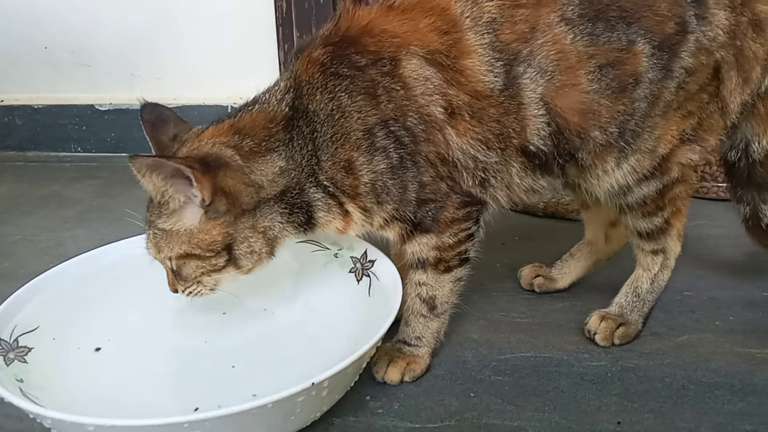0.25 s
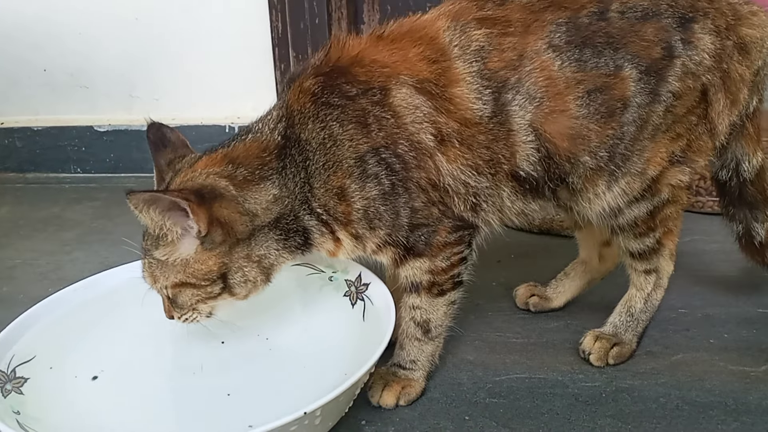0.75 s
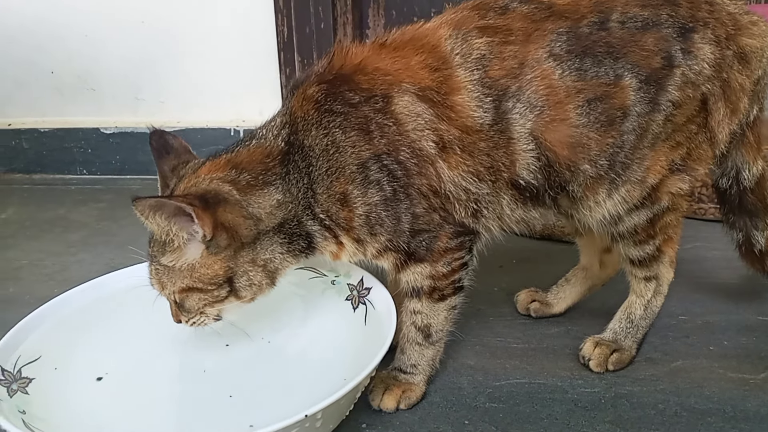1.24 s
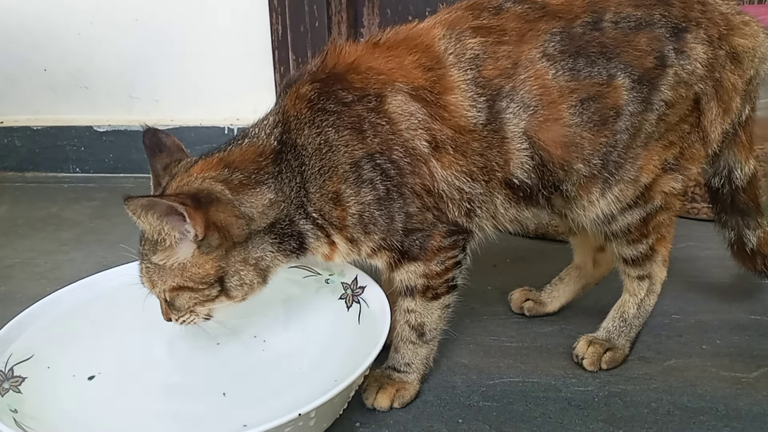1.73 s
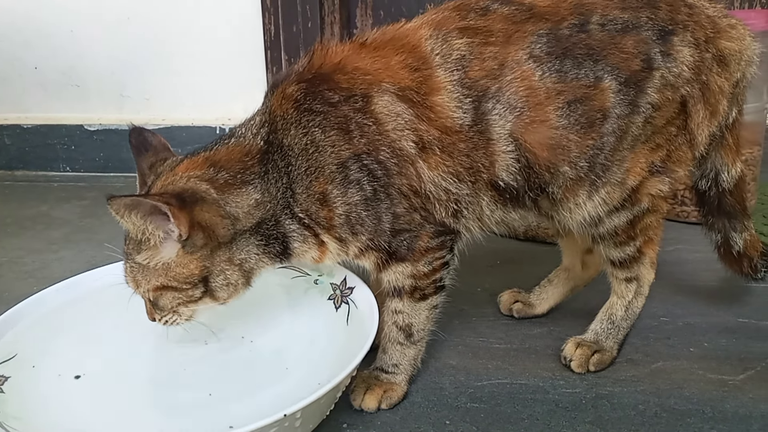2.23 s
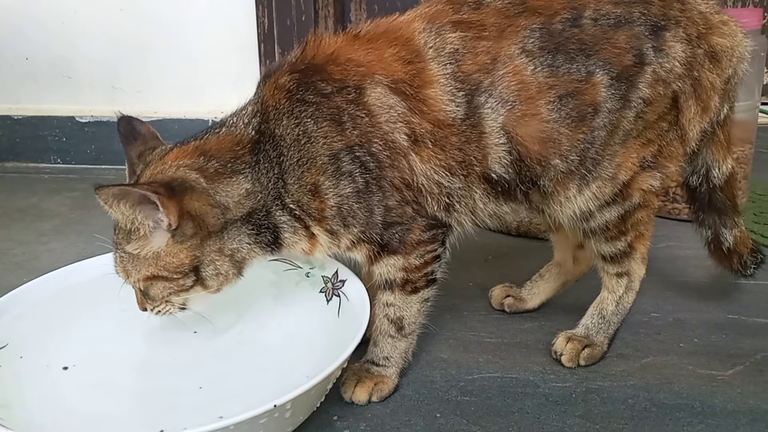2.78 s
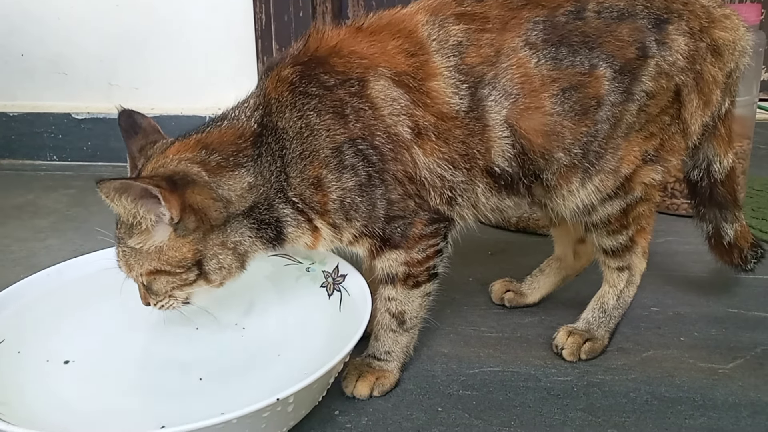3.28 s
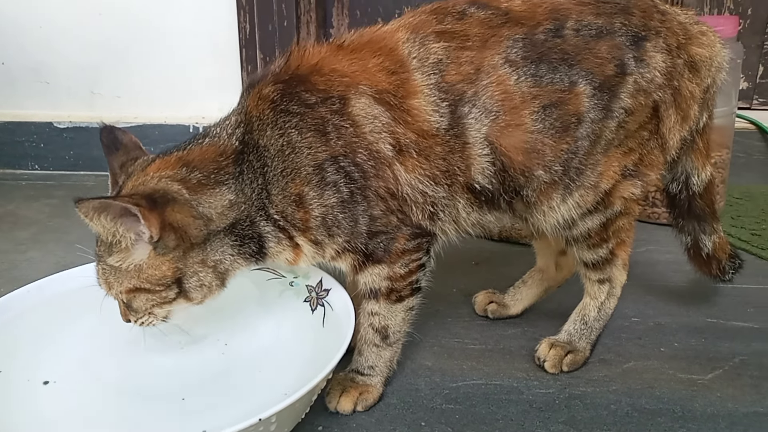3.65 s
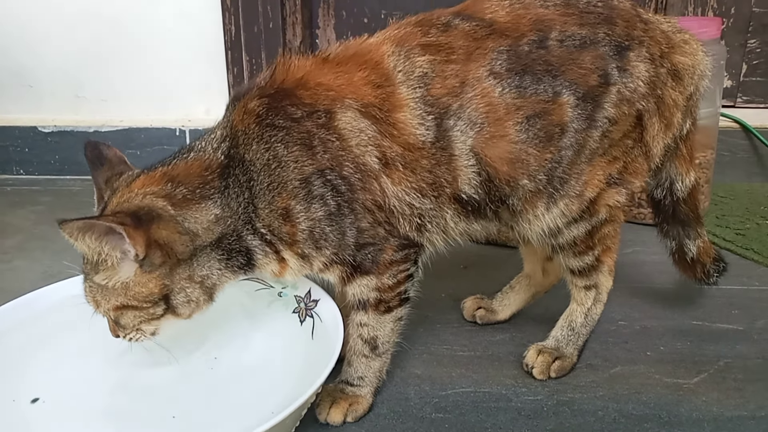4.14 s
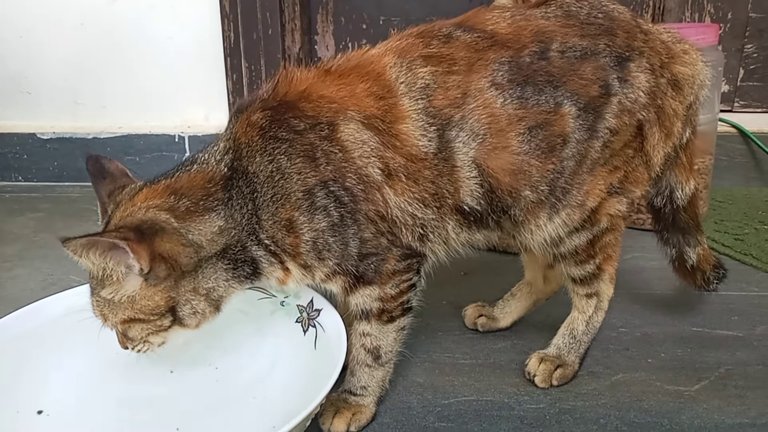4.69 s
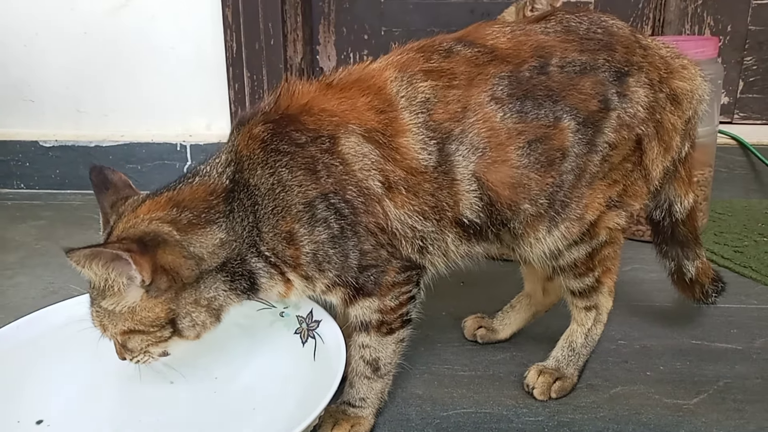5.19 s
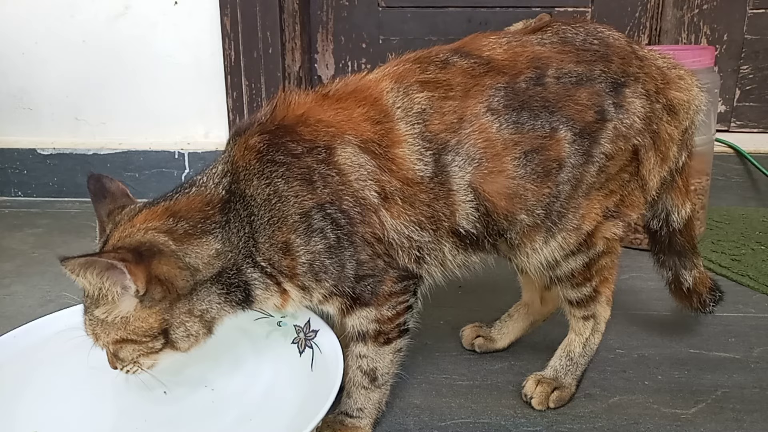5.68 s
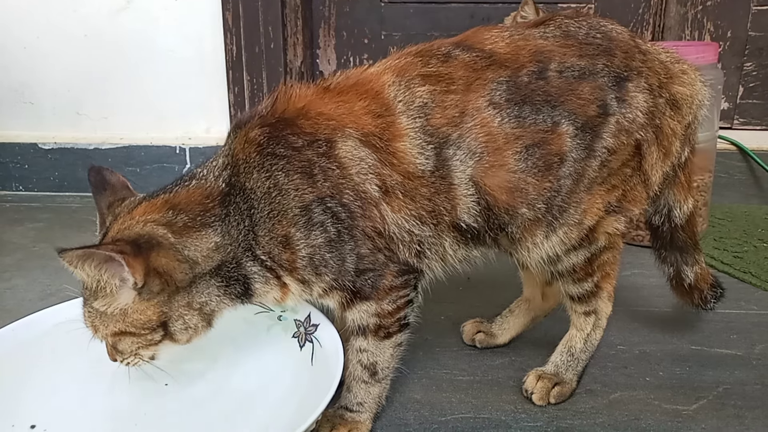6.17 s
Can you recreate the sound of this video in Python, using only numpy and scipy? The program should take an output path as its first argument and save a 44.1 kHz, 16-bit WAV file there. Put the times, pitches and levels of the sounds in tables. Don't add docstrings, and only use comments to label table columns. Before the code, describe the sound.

A cat meows at the start and again midway while water laps softly in a bowl, under a constant high cicada and cricket trill.

```python
import sys
import numpy as np
from scipy import signal
from scipy.fft import rfft, irfft
from scipy.io import wavfile
from scipy.ndimage import uniform_filter1d

SR = 44100
rng = np.random.default_rng(int(sys.argv[2]) if len(sys.argv) > 2 else 0)


def store_wav(level_fs):
    pcm = np.round(np.clip(np.atleast_2d(level_fs), -1, 1) * 32767)
    wavfile.write(sys.argv[1], SR, pcm.T.astype(np.int16))


def how_loud(loudness_db):
    steps = np.asarray(loudness_db, float) / 20
    return 10 ** steps


N = 283122
T = np.arange(N) / SR
F = np.arange(N // 2 + 1) * SR / N + 1e-3
PORT_LAG = 38


def unit(x):
    return x / np.sqrt(np.mean(x ** 2))


def ring(x, hz, width_hz):
    return signal.lfilter(*signal.iirpeak(hz, hz / width_hz, fs=SR), x)


def steep_ring(x, hz, width_hz):
    return ring(ring(x, hz, width_hz), hz, width_hz)


def sos_filter(x, order, edge_hz, kind="low"):
    return signal.sosfilt(signal.butter(order, edge_hz, kind, fs=SR, output="sos"), x)


def on_log(table):
    hz, value = np.transpose(table)
    return np.interp(np.log(F), np.log(hz), value)


def colour(x, spectrum, low_hz, top_hz):
    inside = 1 / (1 + (low_hz / F) ** 40) / (1 + (F / top_hz) ** 40)
    return unit(irfft(rfft(x) * how_loud(on_log(spectrum)) * inside, N))


def walk(rate_hz):
    k = int(SR / rate_hz)
    steps = np.repeat(rng.standard_normal(N // k + 1), k)
    return unit(uniform_filter1d(uniform_filter1d(steps, k), k)[:N])


def phase(hz):
    return 2 * np.pi * np.cumsum(hz) / SR


def streak(hz, width_hz):
    pair = signal.lfilter(*signal.butter(2, width_hz / 2, fs=SR), rng.standard_normal((2, N)))
    turn = phase(hz)
    return unit(pair[0] * np.cos(turn) + pair[1] * np.sin(turn))


def place(x, lean_db):
    g = how_loud(lean_db)
    return x * np.array([2 * g / (1 + g), 2 / (1 + g)]).reshape(2, -1)


def curve(rows):
    s, *cols = np.transpose(rows)
    since_start = T - s[0] + (s[0] == 0)
    gate = np.clip(np.minimum(since_start, s[-1] - T) / 0.0097, 0, 1)
    return gate, [np.interp(T, s, c) for c in cols]


def porch(x, t60_s, damp_hz):
    t = T[:int(t60_s * SR)]
    tail = rng.standard_normal((2, len(t))) * 1000. ** (-t / t60_s) * (t > .004)
    tail = signal.lfilter(*signal.butter(1, damp_hz, fs=SR), tail)
    tail = tail / np.sqrt((tail ** 2).sum(axis=1, keepdims=True))
    return signal.fftconvolve(x, tail, axes=1)[:, :N]


def cicadas():
    # t/s, timbal level/dB, left minus right/dB
    chorus = [
        (0, -32, 22),
        (1.25, -31, 22),
        (2.9, -31, 22),
        (3.6, -32.5, 21),
        (4.5, -33, 19),
        (6.42, -34, 18),
    ]
    # f/Hz, density/dB
    timbal_spectrum = [(3350, -55), (5700, -17.5), (6330, -11), (6790, -6), (6970, -4), (7130, 4.5),
                       (7430, 10.5), (7670, 3.5), (7810, 0), (8080, -14.5), (8310, -14.5), (8900, -25),
                       (11600, -92.5), (19600, -120)]
    # f/Hz, density/dB
    over_spectrum = [(8060, -97), (13700, -50), (13800, -27), (14000, -23.5), (14100, -6.5), (14600, 14),
                     (15100, 15.5), (15600, 21.5), (16000, -17)]
    throb_parts = [(1, 0.11), (3, 0.044), (4, 0.022), (5, 0.033)]
    burst_hz = 23.13
    _, (db, lean_db) = curve(chorus)
    over_db = -8.5 + 0.66 * (db - db.max())
    turn = phase(burst_hz * (1 + 0.004 * walk(3.5)))
    throb = sum(depth * np.cos(k * turn + k * k) for k, depth in throb_parts)
    clicks = rng.standard_normal((2, N)) * (rng.random((2, N)) < .3)
    bursts = clicks * np.clip(1 + throb, 0, None) * how_loud(.5 * walk(14))
    timbal = colour(bursts, timbal_spectrum, 6090, 8460)
    timbal[1] = unit(ring(timbal[1], 6400, 1400))
    over = colour(clicks * np.clip(1 + 1.7 * throb, 0, None), over_spectrum, 12300, 15320)
    song = place(timbal, lean_db - .3) + how_loud(over_db + 1.5) * place(over, lean_db - 10.5)
    return how_loud(db + 0.48) * song


def air():
    # f/Hz, density/dB
    spectrum = [(15, -50), (25, -2.5), (101, 2.5), (202, -2.5), (291, -20), (544, -23), (952, -21),
                (1210, -23.5), (1530, -18), (1700, -18.5), (1900, -19), (2400, -23.5), (3390, -23),
                (4030, -35), (4300, -52), (5590, -36), (9460, -120)]
    # f/Hz, left minus right/dB
    lean = [(60, 3.5), (200, 7), (600, 1.5), (1400, 9), (4400, 17.5)]
    # f/Hz, left-right likeness/0-1
    likeness = [(60, .92), (150, 0.63), (300, 1), (640, 0.34), (1400, 0.028)]
    # t/s, peak level/dB, length/s
    rumble = [(0.155, -55.5, 0.55), (0.905, -58, 0.042), (1.11, -56, 0.044), (1.28, -59, 0.063),
              (1.45, -54.5, 0.062), (1.97, -50, 0.045), (2.32, -60, 0.46), (3.013, -61, 0.045),
              (3.144, -45.5, 0.056), (3.447, -57.5, .2), (4.697, -53.5, 0.39), (4.913, -47, 0.052),
              (5.55, -57, 0.22), (6.313, -54, 0.16)]
    # f/Hz, width/Hz, level/dB, left minus right/dB
    whines = [(105, 11.7, -64.5, 0.5), (1549, 54, -68.5, 14), (1904, 51, -64.5, 36.5), (2200, 20, -76, 15),
              (4740, 440, -65, 18)]
    lull_db, hiss_db = -59, -60.5
    a, b = rfft(rng.standard_normal((2, N)))
    alike = np.clip(on_log(likeness), -.99, .99)
    left = a * np.exp(-2j * np.pi * F * PORT_LAG / SR)
    right = alike * a + np.sqrt(1 - alike ** 2) * b
    pair = np.array([left, right]) * how_loud(on_log(spectrum)) / (1 + (F / 4200) ** 12)
    pair = place(pair, on_log(lean))
    bass = 1 / (1 + (F / 280) ** 6)
    low, high = irfft(pair * np.sqrt(bass), N), irfft(pair * np.sqrt(1 - bass), N)
    gusts = how_loud(lull_db) + sum(how_loud(db) * np.exp(-(2 * (T - s) / length) ** 2) for s, db, length in rumble)
    bed = gusts * how_loud(1.54 * walk(9)) * low / np.std(low.mean(axis=0))
    hiss_level = how_loud(hiss_db + 1.9 * walk(2.354) + 0.72 * walk(18.0))
    bed = bed + hiss_level * high / np.std(high.mean(axis=0))
    for hz, width_hz, db, lean_db in whines:
        waver = how_loud(db + 2.5 * walk(5) + 2.5 * walk(16))
        bed = bed + place(waver * unit(steep_ring(rng.standard_normal(N), hz, width_hz)), lean_db)
    return bed


def cat():
    # t/s, effort/dB, mouth opening/0-1, hoarseness/0-1
    meows = [
        [(0, -31.5, 1, 0.41), (.06, -31, 1, 0.17), (.114, -31.5, 0.91, 0.04), (.2, -40, 0.84, 0.14),
         (.26, -40, 0.6, 0.04), (.3, -45.5, 0.64, 0.01), (.36, -46.5, 0.38, 0), (.45, -47.5, 0.41, .1),
         (.5, -57, 0.33, .2)],
        [(2.6, -52, 0, 0.05), (2.68, -37.5, 0, 0), (2.725, -39, 0.75, 0.27), (2.8, -34.5, 1, 0.51),
         (2.84, -37.5, 0.9, 0.12), (2.93, -33.5, 0.96, 0.11), (3.0, -36.5, 0.75, 0.06),
         (3.06, -44.5, 0.47, 0.05), (3.27, -48.5, 0.38, 0.15)],
        [(3.28, -58, 0.26, 0.4), (3.33, -55, 0.31, 0.55), (3.45, -59, 0.1, .3)],
    ]
    # t/s, pitch/Hz
    pitches = [
        [(0, 552), (.04, 572), (.075, 593), (.114, 603), (.25, 607), (.275, 638), (.43, 652), (.49, 680),
         (.56, 700)],
        [(2.6, 707), (2.625, 640), (2.668, 549), (2.71, 507), (2.76, 523), (2.86, 538), (2.92, 562), (3.0, 577),
         (3.27, 603)],
        [(3.28, 640), (3.33, 657), (3.45, 672)],
    ]
    vowels = [(1, -8, -27, -6, -24), (2, -16, -13, -15, -12), (3, -9, -4, 0, -9), (4, -9, -6, 0, 0),
              (5, 0, 1, 0, 0), (6, -24, -14, -12, -5), (7, -26, -42, -32, -36), (8, -22, -34, -26, -31),
              (9, -18, -29, -26, -31), (10, -1, -28, -12, -26), (11, -6, -14, -12, -29)]
    # f/Hz, width/Hz, depth/dB
    dips = [(1668, 42, -5), (2533, 110, -12.5)]
    lips_db = 42
    half_beat = .6
    out = np.zeros((2, N))
    flutter, rattle = [walk(27.79) for _ in range(6)], [walk(420) for _ in range(4)]
    for n, (pitch, rows) in enumerate(zip(pitches, meows)):
        gate, (effort_db, gape, hoarse) = curve(rows)
        hz = np.interp(T, *np.transpose(pitch))
        turn = phase(hz * (1 + .0015 * walk(60) + .012 * hoarse * walk(45)))
        for k, *vowel in vowels:
            narrow_db, wide_db = vowel[2:] if n else vowel[:2]
            closed_db = narrow_db - lips_db if k > 1 else 0
            db = effort_db + np.interp(gape, (0, .5, 1), (closed_db, narrow_db, wide_db))
            db = db + sum(dip_db * np.exp(-((k * hz - dip_hz) / w) ** 2) for dip_hz, w, dip_db in dips)
            rough = 1 + hoarse * 0.079 * min(k, 8) ** 2 * rattle[k % 4]
            rough = rough + half_beat * hoarse * (k > 3) * np.cos(turn / 2)
            flutter_db = (1.8 * (k > 1) + 1 * (k > 6) + .3) * flutter[k % 6]
            tone = gate * how_loud(db + 3 + flutter_db) * rough * np.sin(k * turn + k * k)
            out += place(tone, 17 - 12 / k ** .9)
    out[1] = np.roll(out[1], -PORT_LAG)
    return out + how_loud(-14) * porch(sos_filter(out, 2, 900, "high"), .45, 4000)


def taps(events, t60_s, width, rise_s=0.00078, crack_hz=0):
    out = np.zeros((2, N))
    t = T[:int(t60_s * SR)]
    fade = np.clip(t / rise_s, 0, 1) * 1000. ** (-t / t60_s)
    chance = rng.standard_normal((len(events), 2, len(t)))
    for (s, db, hz, lean_db, *crack_db), grit in zip(events, chance):
        tap = steep_ring(grit[0] * fade, hz, width * hz)
        tap = tap / np.abs(tap).max()
        if crack_db:
            crack = ring(ring(grit[1] * fade, crack_hz, 0.24 * crack_hz), crack_hz, 0.3 * crack_hz)
            tap = tap + how_loud(min(crack_db[0] + 2.5, 3)) * crack / np.abs(crack).max()
        i = int(s * SR)
        out[:, i:i + len(t)] += place(how_loud(db) * tap, lean_db)[:, :N - i]
    return out


def smacks():
    # t/s, peak level/dB, f/Hz, left minus right/dB
    events = [(0.1125, -41.5, 9900, 24), (0.9471, -32, 11600, -7), (1.0993, -37, 10700, -18),
              (1.1961, -36, 10500, -34), (1.4899, -42, 9400, 12), (1.7723, -36, 11200, -15),
              (2.209, -34, 11400, -32), (2.6598, -43, 11000, -22), (3.2265, -34, 11500, -22),
              (3.3602, -39, 9650, 12), (3.6216, -39, 11000, -29), (3.677, -37, 11200, -25),
              (4.364, -44, 10900, -18), (4.6856, -54, 10900, -14), (5.5023, -42, 10500, -22)]
    return sos_filter(taps(events, 0.0085, 0.22), 4, (8800, 13800), "band")


def laps():
    # t/s, peak level/dB, ring f/Hz, upper crack/dB
    drops = [(0.4415, -37.5, 2960, -32), (0.81, -48, 3000, 2), (0.992, -47, 2800, 2),
             (1.098, -35, 3320, -10), (1.2686, -48, 3260, 7), (1.3243, -40.5, 3500, -20),
             (1.4875, -38.5, 3140, -0.5), (1.593, -51, 3020, -11), (1.7118, -27, 3220, -4.5),
             (1.8547, -45.5, 3060, -3), (1.9292, -40, 3140, -12), (1.9971, -46.5, 3400, -15),
             (2.0677, -30.5, 3510, -15), (2.597, -44, 3100, -17), (3.231, -43, 2870, -20),
             (3.245, -49, 3300, -20), (3.58, -61, 3500, -13), (3.69, -53, 3120, -15), (3.8, -65, 2970, -15),
             (3.36, -44.5, 2730, 9), (3.8706, -67, 2940, 9.5), (3.9302, -49, 3340, -20),
             (4.015, -47.5, 3380, -9), (4.1432, -49.5, 3360, -9), (4.243, -53, 2930, -17),
             (4.3637, -45.5, 3000, -8), (4.448, -50, 3470, -18), (4.5757, -49.5, 3530, -14),
             (4.9453, -36.5, 3420, 6), (5.0676, -49.5, 3450, -10), (5.291, -38.5, 3140, -29),
             (5.3849, -47, 3530, -5), (6.0528, -48.5, 3600, -13), (6.107, -52, 3100, -15),
             (6.185, -53, 3100, -17), (5.12, -46, 4800, 9), (.113, -51, 3300, 9), (.55, -48, 3130, -17),
             (6.387, -51, 3600, -6)]
    lean_db, turn_db_s = 18.5, -1.5
    events = [(s, db, hz, lean_db + turn_db_s * s, crack_db) for s, db, hz, crack_db in drops]
    return taps(events, .028, .16, rise_s=.003, crack_hz=5500)


def knocks():
    # t/s, peak level/dB, ring f/Hz, left minus right/dB
    events = [
        (0.118, -45, 310, 21),
        (1.281, -46, 520, 20),
        (2.53, -53.5, 345, 19),
        (3.359, -47.5, 620, 22),
        (3.449, -45.5, 495, 21),
        (3.667, -50, 537, 14.5),
        (3.87, -48.5, 590, 20),
    ]
    return taps(events, 0.046, 0.67)


def coos():
    # t/s, peak level/dB, f/Hz, left minus right/dB
    events = [(.5, -50.5, 786, 6), (.98, -52, 753, 16), (1.43, -54, 770, 13), (1.5, -45, 3020, 22),
              (1.74, -55, 3040, 16), (1.84, -51, 760, 6), (2.2, -55, 697, 9), (3.24, -50.5, 1050, 9),
              (3.25, -50, 1350, 8), (3.39, -47.5, 1390, 10), (5.27, -63, 720, 18), (5.87, -58.5, 950, 2),
              (5.95, -52, 2200, 12), (6.15, -52, 2200, 20), (6.0, -59, 1300, 15)]
    return taps(events, 0.28, 0.14, rise_s=0.011)


def katydid():
    # start/s, end/s, final level/dB
    phrases = [
        (.18, .78, -69),
        (.93, 1.44, -68),
        (1.52, 2.15, -68),
        (2.25, 2.81, -66.5),
        (2.95, 3.55, -68),
        (3.72, 4.21, -67),
        (4.3, 4.82, -67),
        (4.92, 5.47, -68),
        (5.6, 6.2, -67),
        (6.3, 6.6, -68),
    ]
    swell = 0
    for s, end, db in phrases:
        rise_db = -7 * (end - T) / (end - s)
        ramp = np.clip(np.minimum((T - s) / 0.11, (end - T) / 0.034) + .5, .06, 1)
        swell = swell + how_loud(db + rise_db) * ramp * (T > s - .2) * (T < end + .2)
    strokes = (.5 + .5 * np.cos(phase(142 * (1 + 0.011 * walk(0.77))))) ** 1.5
    buzz = unit(steep_ring(rng.standard_normal((2, N)) * (strokes + 1.0), 10750, 400))
    buzz = buzz * how_loud(2.5 * walk(14))
    return place(swell * colour(buzz, [(10000, 0), (12000, 0)], 10350, 11350), -45)


def cricket():
    # first chirp/s, chirps, period/s
    runs = [
        (.181, 9, .2065),
        (2.066, 3, .198),
        (2.683, 6, .2005),
        (3.898, 7, .2045),
        (5.357, 6, .1983),
    ]
    out = np.zeros((2, N))
    t = T[:int(.13 * SR)]
    hold = np.exp(-(t / .052) ** 1.6)
    accent = .45 * np.exp(-((t - .016) / .005) ** 2)
    shape = np.clip(t / .014, 0, 1) ** 2 * (hold + accent)
    times = np.concatenate([s + period * np.arange(n) for s, n, period in runs])
    chance = rng.standard_normal((len(times), 2, len(t)))
    for s, teeth in zip(times, chance):
        db, lean_db = -41 + 0.7 * teeth[0, 0], 12.5 + 2.5 * teeth[1, 0]
        i = int(s * SR) - 640
        out[:, i:i + len(t)] += place(how_loud(db) * teeth * shape, lean_db)[:, :N - i]
    plate, rim = steep_ring(out, 4700, 330), steep_ring(out, 5250, 650)
    wing = plate + how_loud(-8) * np.roll(rim, 450, axis=1)
    wing = how_loud(12.0) * sos_filter(wing, 4, (4350, 5700), "band")
    return wing + how_loud(-35.0) * porch(wing, 0.54, 11000)


def rasp():
    # t/s, length/s, peak level/dB, starting centre f/Hz
    rasps = [
        (1.959, 0.67, -48, 3654),
        (5.352, 0.6, -49.5, 3900),
    ]
    # share of length, level/dB
    rasp_swell = [(0, -21), (.2, -5), (.6, -0.5), (.86, -12.5), (1, -45)]
    # offset from centre/Hz, width/Hz, level/dB
    ridge_table = [(171.5, 96, -5), (-130, 240, -5), (-650, 130, -11.5)]
    sag_hz = 326
    out = 0
    for s, length, peak_db, start_hz in rasps:
        u = (T - s) / length
        db = peak_db + np.interp(u, *np.transpose(rasp_swell))
        hz = start_hz - sag_hz * np.clip(u, 0, 1)
        spectrum = [(2700, -8), (3300, -3), (3800, 0), (4200, -3)]  # f/Hz, level/dB
        scrape = colour(rng.standard_normal((2, N)), spectrum, 2900, 4170)
        ridges = sum(how_loud(lift_db + 2.5 * walk(12)) * streak(hz + off, w) for off, w, lift_db in ridge_table)
        strokes = (u > 0) * (u < 1) * how_loud(db + 1.1 * walk(110))
        out = out + place(strokes * (how_loud(-3) * scrape + ridges), 14.7)
    return out


def whistles():
    # t/s, length/s, from f/Hz, to f/Hz, level/dB
    slurs = [
        (3.73, .06, 5700, 6150, -63),
        (4.79, .11, 5450, 6250, -64),
        (5.97, .09, 5850, 6300, -62),
    ]
    out = 0
    for s, length, from_hz, to_hz, db in slurs:
        u = np.clip((T - s) / length, 0, 1)
        out = out + how_loud(db) * np.sin(np.pi * u) * streak(from_hz + (to_hz - from_hz) * u, 60)
    return place(out, 14)


def scene():
    near = laps() + knocks() + coos()
    near = near + how_loud(-9.5) * porch(near, 0.082, 6000)
    low = sos_filter(cricket() + whistles() + rasp() + cat() + near + air(), 8, 7500)
    return cicadas() + katydid() + smacks() + low


def band_limit(x):
    return signal.sosfilt(signal.butter(12, 17020, fs=SR, output="sos"), x)


def record(dry):
    mix = sos_filter(dry, 3, 50, "high")
    return band_limit(mix)


dry = scene()
out = record(dry)
store_wav(out)
```